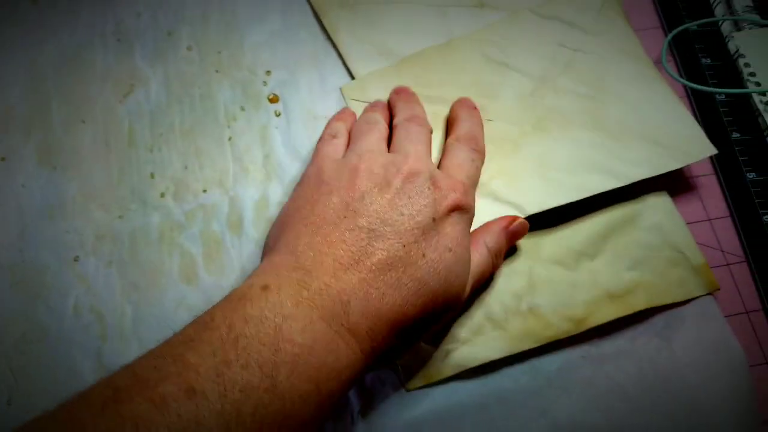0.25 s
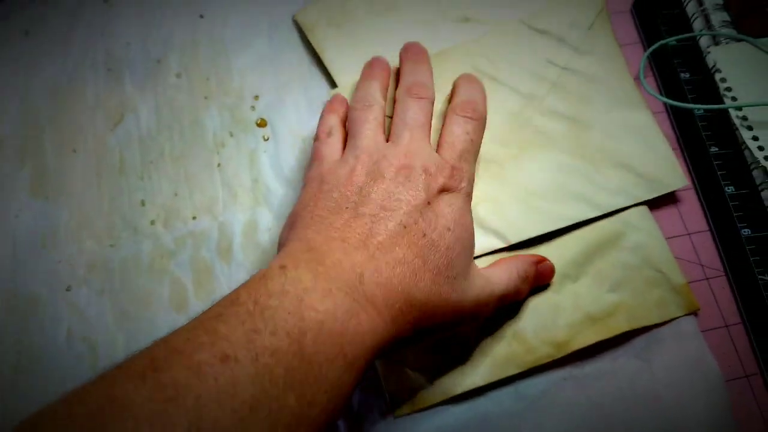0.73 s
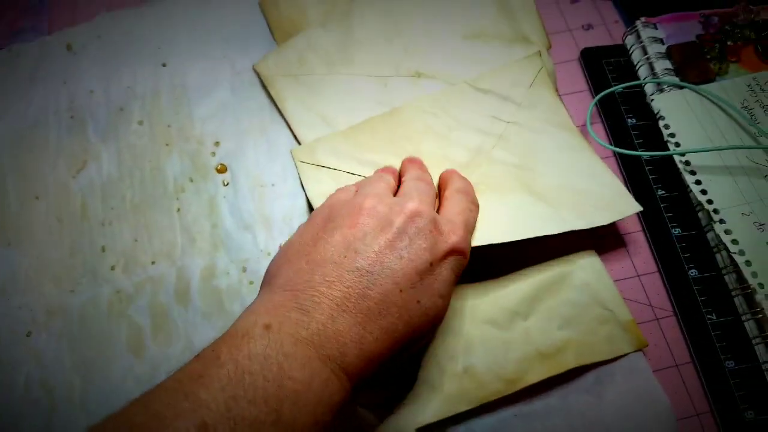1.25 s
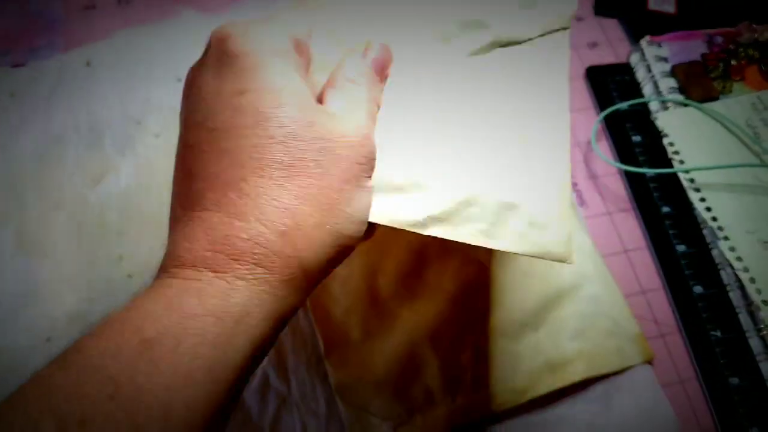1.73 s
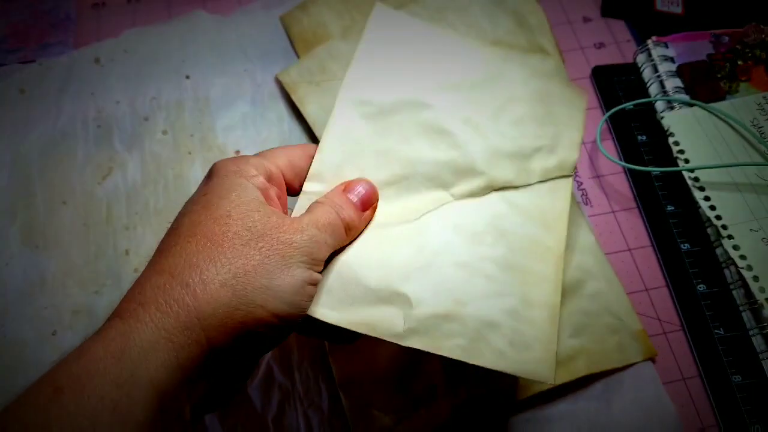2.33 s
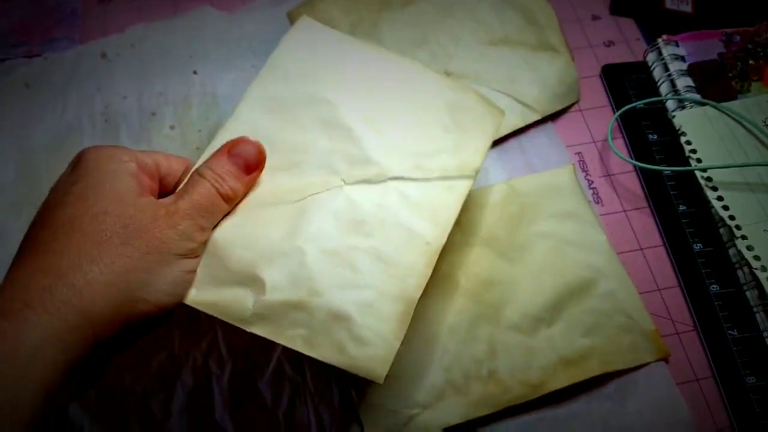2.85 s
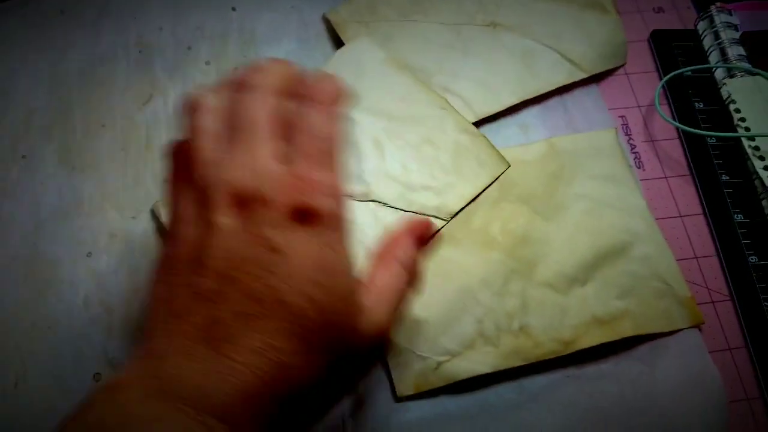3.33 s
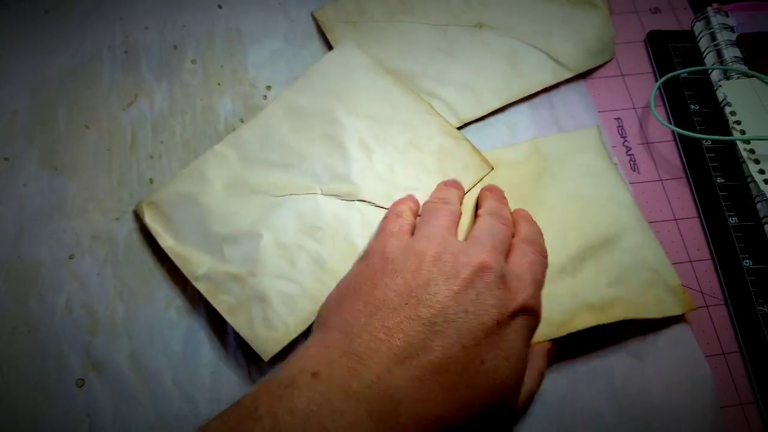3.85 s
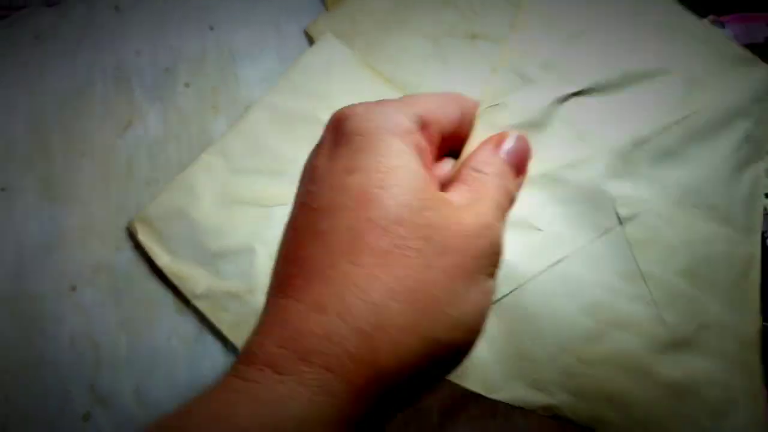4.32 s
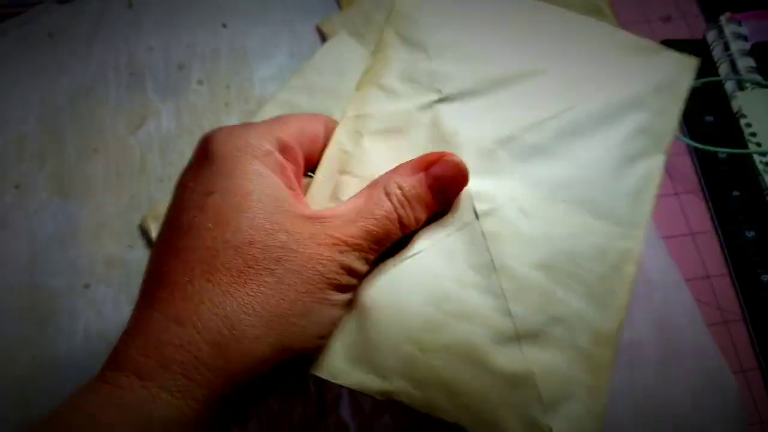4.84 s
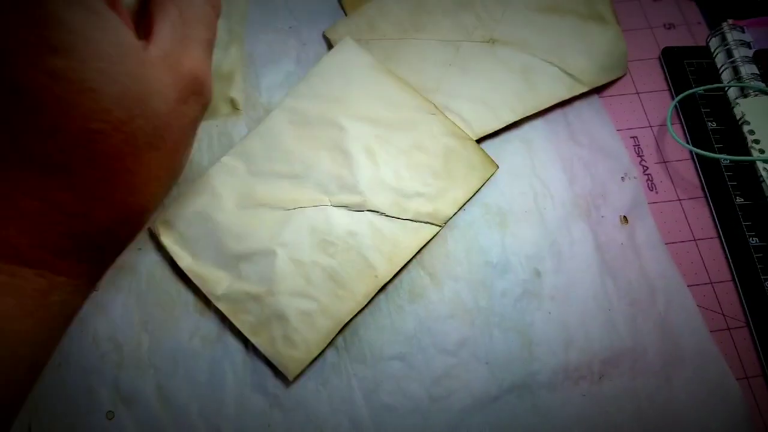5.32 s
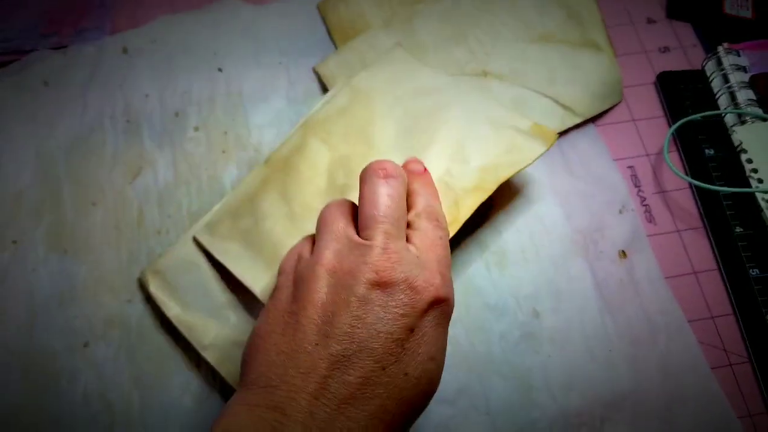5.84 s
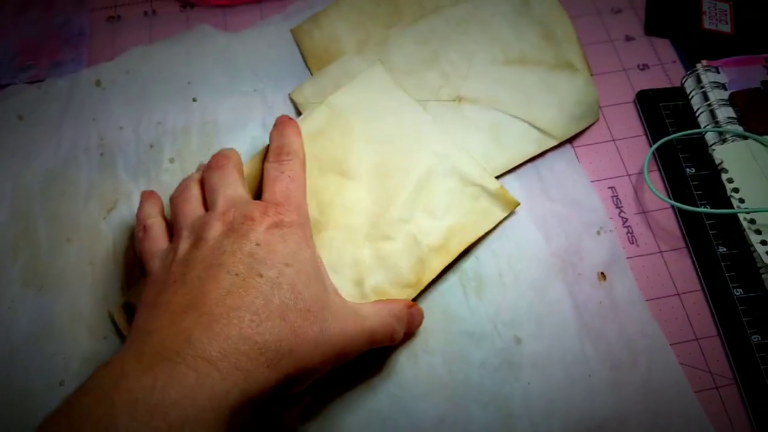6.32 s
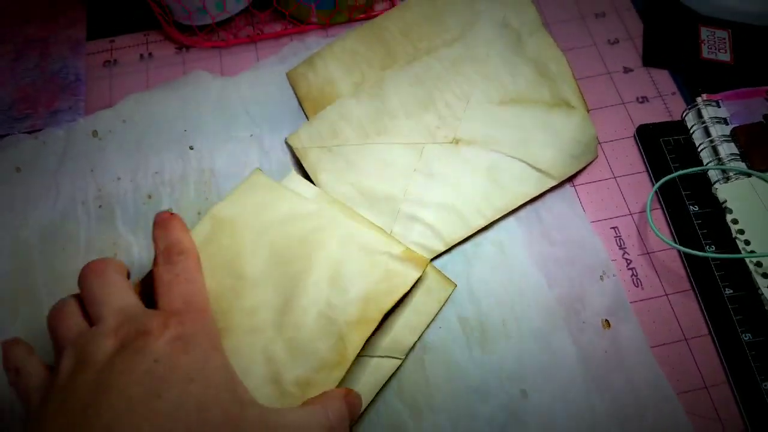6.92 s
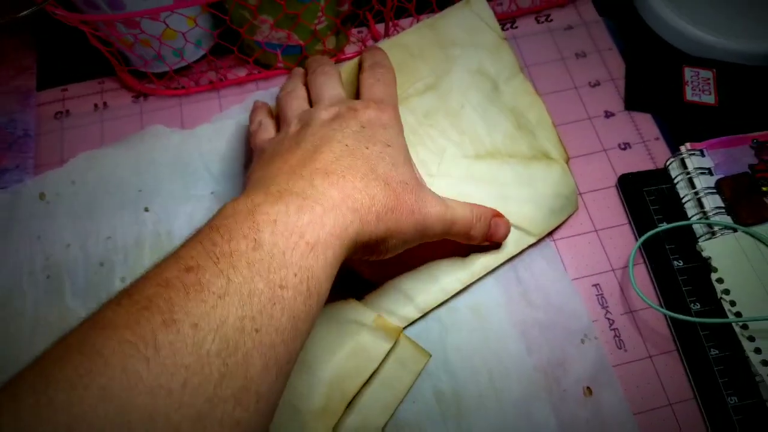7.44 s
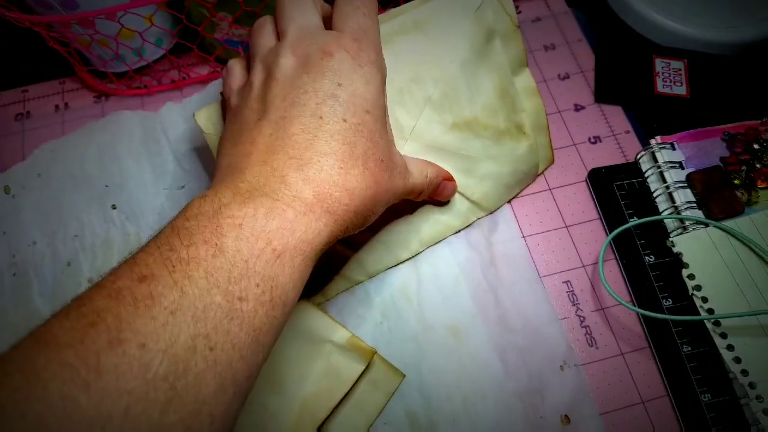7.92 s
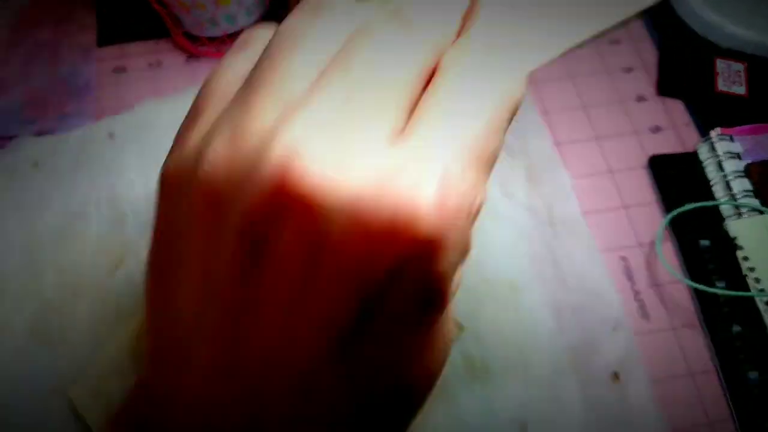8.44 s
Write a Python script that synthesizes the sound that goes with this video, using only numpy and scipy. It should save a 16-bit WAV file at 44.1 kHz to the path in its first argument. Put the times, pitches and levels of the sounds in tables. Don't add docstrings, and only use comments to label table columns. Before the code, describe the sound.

Very close stereo handling of stiff dried paper envelopes on a worktable, in a small room with a short soft reflection, faint low house rumble and microphone hiss. From 0 to 1.5 s a hand presses and gathers the top envelope: dense dry crackle, sharp snaps around 0.35, 0.7, 0.93 and 1.42, with grainy rubbing between. From 1.6 it is lifted and turned, with brighter rustle and strong snaps at 2.15 to 2.27; then all sound drops out from about 2.3 to 2.47. Lighter rustles and a setting down follow to 3.5. Rubbing swells at 3.85 and 4.15, then the loudest hollow crack and pop come at 4.45 to 4.5. Smaller pops run to 5.1. From 5.3 to 7.6 it is sparser and softer, sliding and stacking, with a short scrape at 6.7. Rubbing rises at 7.8, crackles thicken, and a bright burst hits at 8.3 before fading.

```python
import sys
import numpy as np
from scipy import signal
from scipy.fft import rfft, irfft
from scipy.io import wavfile
from scipy.ndimage import uniform_filter1d

SR = 44100
rng = np.random.default_rng(int(sys.argv[2]) if len(sys.argv) > 2 else 0)


def dump(signal):
    limited = np.clip(np.atleast_2d(signal).T, -1, 1)
    pcm = np.round(limited * 32767).astype(np.int16)
    wavfile.write(sys.argv[1], SR, pcm)


def boost_factor(decibels):
    exponent = np.asarray(decibels, float) / 20
    return 10 ** exponent


N = 382788

PORT_LAG = 3.72


def unit(x):
    return x / np.sqrt(np.mean(x ** 2))


def colour(x, points, size=4096):
    hz, db = np.transpose(points[:-1])
    log_hz = np.log(np.maximum(np.arange(size // 2 + 1) * SR / size, 1))
    cepstrum = irfft(np.interp(log_hz, np.log(hz), db) * np.log(10) / 20)
    cepstrum[1:size // 2] *= 2
    cepstrum[size // 2 + 1:] = 0
    response = irfft(np.exp(rfft(cepstrum))).reshape((1,) * (x.ndim - 1) + (-1,))
    return signal.fftconvolve(x, response, axes=-1)[..., :x.shape[-1]]


def walk(rate):
    hold = int(SR / rate)
    steps = np.repeat(rng.standard_normal(N // hold + 1), hold)
    return unit(uniform_filter1d(uniform_filter1d(steps, hold), hold)[:N])


def decay(t, t60_s):
    return np.exp(-t * np.log(1000) / t60_s)


def ports(x, lag):
    i = np.arange(x.shape[-1])
    return np.array([np.interp(i - lag / 2, i, x), np.interp(i + lag / 2, i, x)])


def lean(pan_db):
    return np.array([pan_db, -pan_db]) / 2


def hand_pan(s):
    # time_s, left_minus_right_db
    hand_places = [(0.1, 2.5), (0.9, 1.5), (1.6, 1.5), (2.2, 3.5), (2.8, 6.5), (3.3, 5), (3.8, 0.65),
                   (4.4, 0.0), (5.0, 4), (5.7, 4.5), (6.1, 2), (7.2, 5), (8.0, 1.5), (8.6, 2.0)]
    return np.interp(s, *np.transpose(hand_places))


def paper_bands(x):
    # freq_hz, level_db (per Hz)
    paper_colour = [(120, -30.5), (200, -6), (564, -7), (653, -3), (957, -4), (1110, -7.5), (1380, -5),
                    (1620, -7), (2420, -5.5), (5700, -7.5), (7760, -10.5), (9140, -14), (15500, -15)]
    edges_hz = [1100, 3300, 7800]
    x = colour(x, paper_colour)
    shapes = [(edges_hz[0], "low"), (edges_hz[:2], "band"), (edges_hz[1:], "band"), (edges_hz[2], "high")]
    return [signal.sosfilt(signal.butter(3, hz, kind, fs=SR, output="sos"), x) for hz, kind in shapes]


def house():
    # freq_hz, level_db (per Hz)
    house_colour = [(15, -46.5), (25, -20), (37, -18), (59, -10), (71, -14.5), (82, -14.5), (136, -14.5),
                    (233, -36), (399, -33), (684, -44), (895, -40.5), (1020, -39.5), (1660, -41.5),
                    (3930, -48.5), (15500, -52)]
    # freq_hz, level_db (rms)
    hum_tones = [(54.5, -74.5), (123, -84.5)]
    shared = colour(rng.standard_normal(N), house_colour)
    own = colour(rng.standard_normal((2, N)), house_colour)
    rumble = signal.sosfilt(signal.butter(1, 200, fs=SR, output="sos"), (shared - own) * 0.4)
    t = np.arange(N) / SR
    hum = sum(boost_factor(db) * np.sqrt(2) * np.sin(2 * np.pi * hz * t) for hz, db in hum_tones)
    return unit(own + rumble) * boost_factor(-68.5 + 0.73 * walk(5.0)) + hum * [[1], [0.7]]


def snaps(table, longest_s, size=5000):
    scatter_t60_s, shorter_per_db = 0.042, 0.16
    aftercrack_db = 3.5
    out, t, bursts, pans = np.zeros((2, N + size)), np.arange(size) / SR, [], []
    for s, peak_db, edge_db, hz in table:
        noise, chance = rng.standard_normal((3, size)), rng.random(4)
        t60 = np.clip(scatter_t60_s * boost_factor(-shorter_per_db * (peak_db + 27.5)), .015, longest_s)
        pan_db = 1.053 * hand_pan(s) + 6.47 * (chance[1] - .5)
        crack = min(.075 / t60, 1) * np.exp(-t / (.0003 + .0004 * chance[0]))
        scatter = 0.28 * decay(t, t60) * (1 - np.exp(-t / (0.00024 + 0.88 * t60 ** 2)))
        scatter = scatter * boost_factor(aftercrack_db * np.repeat(noise[2, ::50], 50))
        both = ports(noise[0] * (crack + 0.93 * scatter), -1.2 * pan_db) + 1.18 * noise[1:] * scatter
        crease_ring = signal.lfilter(*signal.iirpeak(hz, 2.5, fs=SR), both)
        bursts.append(both + 1.2 * crease_ring)
        pans.append(pan_db)
    banded = paper_bands(np.array(bursts))
    for (s, peak_db, edge_db, hz), pan_db, flap, body, slip, edge in zip(table, pans, *banded):
        middle = body + boost_factor(0.36 * edge_db + 6.0) * slip
        gains = boost_factor([-21, 0, edge_db])
        burst = sum(g * b / np.abs(b).max() for g, b in zip(gains, (flap, middle, edge)))
        i = int(s * SR)
        out[:, i:i + size] += boost_factor(peak_db + 7.5 + lean(pan_db)[:, None]) * burst
    return out[:, :N]


def fine_creases():
    # start_s, peak_db, bright_edge_db, ring_hz
    fine_table = [(0.0144, -35, -16, 1490), (0.0245, -36.5, -10, 3000), (0.045, -44, -18, 2500),
                  (0.068, -35, -15, 2490), (0.1017, -41.5, -6, 2190), (0.2428, -38.5, -23, 1390),
                  (0.302, -54, -25, 2840), (0.4, -30.5, -11, 2500), (0.5641, -54, -14.5, 4540),
                  (0.5886, -38.5, -32, 1550), (0.7731, -46, -13.5, 4980), (1.0462, -34, -10, 2400),
                  (1.068, -34, -3, 2490), (1.087, -36, -6, 2200), (1.1209, -40, -13, 3000),
                  (1.1298, -38.5, -32, 1370), (1.1747, -49, -22.5, 2150), (1.1947, -44, -28, 2730),
                  (1.342, -38.5, -8, 4500), (1.355, -38, 3.5, 6000), (1.497, -49, -17, 2500),
                  (1.5319, -45, -15, 3470), (2.481, -38.5, -12.5, 1504), (4.572, -42, -30, 800),
                  (3.68, -46, -8, 4500), (3.74, -44.5, -15, 3500), (3.822, -38, -15, 3500),
                  (3.982, -46, -15, 4500), (4.066, -31, -17, 4000), (5.135, -52, -11, 6960),
                  (5.437, -44, -28, 1180), (5.9562, -54, -6.5, 3130), (6.257, -52, -25, 1380),
                  (6.4177, -48, -11, 3180), (6.6362, -42.5, -11, 3010), (7.3151, -63.5, -40, 1380),
                  (7.678, -51.5, -11, 2500), (7.7721, -47, -23, 1480), (7.947, -42, -34, 1300),
                  (8.2515, -33.5, -12, 3840), (8.2734, -34, -1, 3390), (8.3, -32, -25, 2400),
                  (8.5738, -54, -16, 4960), (2.1225, -38, -12, 4000), (8.109, -24, 0, 2500),
                  (8.117, -27, -2, 4050), (0.9945, -43, -18, 2300), (1.1765, -45, -10, 2200),
                  (8.1555, -45, -10, 2800)]
    return snaps(fine_table, 0.052, size=2500)


def stroke_db(offset_db, colour_share, steep):
    # fastest_s, level_db, swell_s, fade_s, brightness_db
    early = [(0.024, -49.5, 0.079, 0.38, -2), (.399, -43, 0.35, 0.27, -0.5),
             (0.598, -39.5, 0.028, 0.049, 0), (0.693, -41.5, 0.11, 0.29, 1.5),
             (1.004, -38.5, 0.18, 0.25, -0.5), (1.24, -43, 0.13, 0.54, 9.5),
             (1.427, -41.5, 0.27, 0.12, -3.5), (1.56, -47, 0.067, 0.53, 4), (1.69, -52, 0.16, 0.23, 3),
             (1.815, -38.5, 0.13, 0.07, 7), (1.95, -41, 0.1, 0.17, 7), (2.135, -45.5, 0.097, 0.039, -2.5),
             (2.409, -41.5, 0.28, 0.48, 1.5), (2.661, -47.5, 0.29, 0.24, 12), (3.018, -49, 0.033, 0.3, 1),
             (3.075, -40, 0.1, 0.21, 22), (3.169, -51, 0.091, 0.23, -0.5),
             (3.302, -49.5, 0.053, 0.071, -0.5), (3.374, -47.5, 0.066, 0.1, 0), (3.48, -59, .05, 0.13, 14),
             (3.693, -45, 0.017, 0.061, 7), (3.868, -36, 0.12, 0.17, 1.5), (3.76, -46.5, 0.037, 0.13, 7),
             (3.97, -41, 0.084, 0.18, 4), (4.163, -35, 0.33, 0.12, 2.5)]
    # fastest_s, level_db, swell_s, fade_s, brightness_db
    late = [(4.3, -49, 0.098, 0.096, 5), (4.52, -41.5, 0.14, 0.29, 4.5), (4.62, -51, 0.11, 0.1, 0),
            (4.69, -53, 0.33, 0.12, -1), (4.789, -73, 0.15, 0.064, -9), (4.88, -52, 0.029, 0.14, 16),
            (4.929, -46.5, 0.12, 0.13, 1), (5.29, -59, 0.051, 0.18, 5), (5.12, -63, .1, 0.11, -3),
            (5.385, -48, 0.17, 0.29, 11.5), (5.58, -52, 0.3, 0.13, -0.5), (5.96, -59, 0.012, 0.16, -2),
            (6.128, -46.5, 0.14, 0.15, -3.5), (6.26, -55, 0.16, 0.043, 2.5), (6.32, -68.5, 0.061, 0.23, 1),
            (6.57, -55.5, 0.035, 0.11, 13), (6.645, -51, 0.086, 0.13, -3.5), (6.97, -55, 0.14, 0.05, 2.5),
            (6.433, -50, 0.042, 0.35, -0.5), (6.715, -41.5, 0.12, 0.067, -2), (6.79, -60, .1, 0.13, -1.5),
            (7.074, -54, 0.29, 0.21, 1), (7.152, -59, 0.13, 0.049, 3), (7.4, -71.5, 0.27, 0.37, 9.5),
            (7.64, -68.5, 0.065, 0.19, -1), (7.7, -61, 0.018, 0.13, -7), (7.788, -46.5, 0.1, 0.38, -7.5),
            (7.865, -33, 0.15, 0.39, 1), (7.98, -40, 0.26, 0.095, -3), (8.09, -41, 0.25, 0.2, 1),
            (8.22, -37.5, 0.077, 0.14, 1.5), (8.28, -33.5, 0.027, 0.29, 10),
            (8.308, -26.5, 0.099, 0.021, 3), (8.36, -41.5, 0.045, 0.075, -3.5),
            (8.46, -59, 0.092, 0.084, 15), (8.589, -64, 0.46, 0.45, 7)]
    start, stall = 2.5, .7
    t, power = np.arange(0, N + 64, 64) / SR, 1e-12
    for s, level_db, swell, fade, bright_db in early + late:
        away = np.where(t < s, (s - t) / max(swell, .01), (t - s) / max(fade, .01))
        bend = 1 + np.where(t < s, start, stall) * np.maximum(away - 1, 0)
        peak_db = level_db + offset_db + colour_share * bright_db
        power = power + boost_factor(peak_db - 20 * steep * away * bend) ** 2
    return np.interp(np.arange(N) / SR, t, 10 * np.log10(power))


def rubbing():
    # offset_db, db_per_brightness_db, steepness
    band_drive = [
        (-15, -0.55, 1.19),
        (-1, -1.12, 1.32),
        (1.5, -0.1778, 1.317),
        (-2, 0.06, 1.51),
    ]
    # freq_hz, level_db
    slide_colour = [(300, 0.5), (650, -1), (950, -1), (1330, -0.5), (1750, -1), (2200, 0), (4200, -1),
                    (9000, -0.5), (15500, 0)]
    slips_per_s, ticks_per_s, lag_per_db = 14000, 130, -3
    pan_db = 0.787 * hand_pan(np.arange(N) / SR)
    sizes = boost_factor(np.minimum(2.0 * rng.exponential(size=(3, N)), 6))
    slips = rng.standard_normal((3, N)) * (rng.random((3, N)) < slips_per_s / SR) * sizes
    ticks = rng.random(N) < ticks_per_s * boost_factor(4 * walk(3)) / SR
    ticks = ticks * boost_factor(np.minimum(3.5 * rng.exponential(size=N), 7))
    ticks = signal.lfilter([1], [1, -np.exp(-1 / (.0018 * SR))], ticks)
    pressure = boost_factor(1.6 * walk(35)) * np.sqrt(1 + .8 * ticks ** 2)
    lag = PORT_LAG + lag_per_db * pan_db + 2.5 * walk(3.5)
    both = pressure * (ports(slips[0], lag) + .8 * slips[1:])
    out = 0
    for drive, band in zip(band_drive, paper_bands(colour(both, slide_colour))):
        flicker_db = 1.2 * walk(18)
        out = out + boost_factor(stroke_db(*drive) + flicker_db) * unit(band)
    return out * boost_factor(lean(pan_db))


def crease_snaps():
    # start_s, peak_db, bright_edge_db, ring_hz
    press = [(0.0545, -29, 0, 4700), (0.178, -41.5, 4.5, 6140), (0.2158, -36, 2.5, 1500),
             (0.2558, -32, -25, 2190), (0.2872, -25.5, -22.5, 1840), (0.3545, -17, -4, 1060),
             (0.3773, -20, -6, 1260), (0.4407, -34, -17, 2230), (0.46, -25, -3, 4500),
             (0.4909, -31.5, -1.5, 1720), (0.5395, -43.5, -25.5, 2060), (0.598, -25.5, -10, 1620),
             (0.659, -30.5, -3, 2550), (0.676, -26, -5, 4660), (0.6881, -17.5, -12, 1930),
             (0.7053, -14.5, -9.5, 1820), (0.7308, -27, -8, 3750), (0.8647, -32, -2, 2290),
             (0.8962, -30, -17, 2170), (0.9306, -16, -10.5, 1380), (0.9988, -25, -40, 2180),
             (1.041, -34, -6, 2320), (1.1007, -35.5, -27, 2290), (1.2095, -29, -7.5, 4450),
             (1.2376, -23, -22, 1560), (1.321, -41, -20, 2210), (1.409, -37, -18.5, 3820),
             (1.42, -19.5, -11, 1400), (1.4458, -21.5, -8, 2370), (1.5501, -38.5, -29, 1390)]
    # start_s, peak_db, bright_edge_db, ring_hz
    turn = [(1.6028, -29, -23, 1340), (2.1048, -27, -6.5, 4760), (2.146, -21, -14.5, 3400),
            (2.2285, -17, -10.5, 3600), (2.2681, -11, -4.5, 7200), (2.6732, -27.5, -48.5, 1300),
            (2.8199, -21, -19.5, 3760), (2.92, -39.5, -25, 1100), (3.1593, -33.5, -7.5, 5170),
            (3.261, -25.5, -12, 4450), (3.348, -28.5, -12, 2230), (3.3816, -29.5, -15, 3900),
            (3.448, -39.5, -6, 4800), (3.513, -46.5, -6, 4680), (3.7904, -34, -12.5, 1280),
            (3.8438, -24.5, -0.5, 4050), (3.8754, -21.5, -3, 4850), (3.8846, -24.5, 5.5, 4350),
            (4.02, -36, -12.5, 5160), (4.0291, -28, -1.5, 1370), (4.0828, -22, 2.5, 2770),
            (4.2246, -34, -6, 1550), (4.27, -35, -6, 3500), (4.306, -31.5, -27, 4900),
            (4.319, -33.5, -22, 3870), (4.351, -43, -32, 1270), (4.4404, -22, -14.5, 3700),
            (4.4659, -9.5, -10, 1750), (4.5087, -13.5, -16, 3730), (4.6526, -46, -24, 1200)]
    # start_s, peak_db, bright_edge_db, ring_hz
    stack = [(4.713, -24, -15, 1270), (4.9283, -40.5, -41, 1840), (4.944, -39, -25, 1300),
             (4.984, -22.5, -25.5, 1600), (5.0606, -27.5, -18, 1410), (5.0904, -26, -24, 2250),
             (5.1734, -32.5, -9, 4270), (5.5392, -27, -11, 3420), (5.558, -36, -27, 2400),
             (5.5908, -24, -17, 1400), (5.9931, -38.5, -14.5, 1210), (6.011, -61, -38, 1250),
             (6.0572, -36, -37, 3730), (6.1004, -27, -13, 1150), (6.509, -35, -16, 1360),
             (6.9014, -40.5, -2, 6030), (7.0233, -31.5, -12, 4900), (7.041, -36.5, -35, 1390),
             (7.1063, -29, -12, 3390), (7.3607, -47, -1.5, 3164), (7.6881, -40, 4, 1240),
             (7.7854, -28, -20, 1430), (7.8211, -26.5, 2, 4520), (8.012, -19, -4, 2410),
             (8.0688, -28.5, -8, 3740), (8.1125, -22, 2, 7040), (8.1312, -25, -2, 4430),
             (8.3119, -12.5, -2, 2370), (8.3619, -26, -28, 2680), (8.3863, -28, -9, 4650)]
    return snaps(press + turn + stack, 0.11)


def panel_rubs(size=6500):
    # loudest_s, level_db, swell_s, fade_s, panel_hz
    panels = [(0.2, -62.5, 0.057, 0.13, 1380), (1.05, -50, 0.054, .08, 2280),
              (1.261, -44, 0.052, 0.029, 2030), (1.424, -28, 0.02, 0.012, 1340),
              (3.695, -43, 0.014, 0.028, 4480), (3.951, -50, 0.052, 0.048, 1340),
              (4.9, -52, 0.043, .12, 4200), (5.39, -58, 0.19, 0.12, 3970), (5.45, -59, 0.028, 0.044, 1220),
              (5.66, -68, 0.053, 0.15, 950), (6.11, -48.5, 0.016, 0.031, 2800),
              (6.24, -60.5, 0.26, 0.083, 1070), (6.434, -46, 0.02, 0.056, 3200),
              (6.513, -54, 0.071, 0.035, 1350), (6.715, -35.5, 0.032, 0.023, 2040),
              (6.8, -65, 0.056, 0.039, 1350), (7.044, -43, 0.0046, 0.022, 1440),
              (7.86, -49, 0.033, 0.085, 2800), (8.013, -36.5, .004, 0.017, 1290),
              (8.073, -30, .015, 0.009, 3820), (8.242, -41.5, 0.009, .01, 700),
              (8.314, -18.5, 0.0069, 0.0085, 2340), (8.589, -58, 0.053, 0.027, 4500)]
    # loudest_s, level_db, swell_s, fade_s, panel_hz
    sheets = [(0.385, -53, 0.032, 0.09, 164), (2.5, -53, .01, 0.031, 248), (3.875, -56, 0.049, 0.12, 109),
              (4.361, -61, .05, 0.044, 170), (5.1, -54.5, .02, 0.042, 220),
              (6.16, -60.5, 0.066, 0.1, 266.6), (7.13, -61.5, .04, .06, 169),
              (0.258, -39, .003, 0.01, 2190), (0.29, -41, .003, 0.011, 1880),
              (1.132, -41, .003, 0.009, 1410), (2.234, -31, 0.004, 0.0095, 3300),
              (2.675, -42, 0.003, 0.0091, 1200), (2.922, -47, 0.0028, 0.013, 1136),
              (5.063, -36, .003, 0.0094, 2750), (7.363, -49.5, 0.0034, 0.015, 5000),
              (2.86, -53, .04, 0.035, 5500), (3.081, -43.5, 0.068, 0.099, 6470),
              (4.62, -56, 0.088, 0.066, 11500), (4.91, -52, .04, 0.13, 11500),
              (5.4, -59, 0.095, 0.16, 11000), (5.74, -67.5, .02, 0.033, 3900)]
    panel_q, hiss_db, hissing_hz = 4.3, -7.5, 2500
    out, t = np.zeros((2, N + 2 * size)), np.arange(-size, size) / SR
    for s, level_db, swell, fade, hz in panels + sheets:
        noise = rng.standard_normal((3, 2 * size))
        slips = ports(noise[0], PORT_LAG) + 0.6 * noise[1:]
        q = np.clip(panel_q * 5000 / hz, 1, panel_q)
        sung = signal.lfilter(*signal.iirpeak(hz, q, fs=SR), slips)
        sung = unit(signal.lfilter(*signal.iirpeak(hz, 1, fs=SR), sung))
        hiss = unit(np.diff(slips, prepend=0) + slips / 2)
        sung = sung + boost_factor(hiss_db) * min(hz / hissing_hz, 1) * hiss
        away = np.where(t < 0, -t / max(swell, .003), t / max(fade, .003))
        i = int(s * SR)
        out[:, i:i + 2 * size] += boost_factor(level_db - 20 * away ** 1.4 + lean(hand_pan(s))[:, None]) * sung
    return out[:, size:size + N]


def ring(hz, t60, t):
    return np.sin(2 * np.pi * hz * t) * decay(t, t60)


def pops(size=7000, count=7):
    # start_s, peak_db, panel_hz, t60_s
    pop_table = [(0.356, -26, 1030, 0.032), (0.372, -30, 670, 0.05), (0.703, -26, 970, 0.013),
                 (1.128, -36.5, 880, 0.026), (1.415, -25.5, 830, 0.059), (1.444, -26, 988, 0.043),
                 (1.547, -41, 680, 0.11), (1.657, -43, 327, 0.07), (1.691, -46, 326, 0.14),
                 (1.966, -40, 753, 0.048), (2.1442, -31, 640, 0.049), (2.189, -42, 654, 0.027),
                 (2.265, -34, 670, 0.11), (2.502, -31.5, 673, 0.038), (2.6701, -28, 1055, 0.02),
                 (4.466, -24.5, 900, 0.027), (4.508, -15.5, 802, 0.04), (4.652, -29.5, 950, 0.02),
                 (4.712, -30, 680, 0.048), (4.854, -47, 370, 0.075), (4.926, -35, 937, 0.041),
                 (4.983, -26.5, 927, 0.024), (5.055, -29, 994, 0.042), (5.087, -29, 856, 0.029),
                 (5.536, -41, 300, 0.25), (5.592, -26.5, 480, 0.037), (6.01, -31, 1106, 0.027),
                 (7.784, -30, 880, 0.037), (7.974, -30, 766, 0.036), (8.309, -28.5, 784, 0.012),
                 (2.0978, -47, 620, .018), (2.128, -33, 800, 0.022), (2.138, -32.5, 700, 0.021),
                 (2.008, -44.5, 860, 0.022), (2.66, -44.5, 820, 0.027)]
    # freq_hz, level_db (relative to the pop), t60_s
    table_modes = [(115, -29, 0.12), (164, -22.5, 0.099), (236, -25, 0.028)]
    out, t = np.zeros(N + size), np.arange(size) / SR
    thud = sum(boost_factor(db) * ring(hz, t60, t) for hz, db, t60 in table_modes) * (1 - np.exp(-t / 0.0011))
    for s, peak_db, hz, t60 in pop_table:
        chance, t60 = rng.random((count, 2)), np.clip(t60, .015, .25)
        neighbours = chance[:, 1:] * ring(hz * (.45 + 1.4 * chance[:, :1]), .7 * t60, t)
        neighbours += chance[:, :1] * ring(hz * (.62 + .75 * chance[:, 1:]), .8 * t60, t)
        panel = (ring(hz, t60, t) + 0.6 * neighbours.sum(axis=0)) * (1 - np.exp(-t / 0.001))
        i = int((s + .0018) * SR)
        out[i:i + size] += boost_factor(peak_db) * (panel / np.abs(panel).max() + thud)
    return ports(out[:N], -2.5) * boost_factor([[1.2], [-1.2]])


def room(size=8000):
    t60_s, level_db = 0.12, -14.5
    t = np.arange(size) / SR
    tail = rng.standard_normal((2, size)) * decay(t, t60_s) * (t > .004)
    tail = signal.sosfilt(signal.butter(1, 7000, fs=SR, output="sos"), tail)
    return boost_factor(level_db) * unit(tail) / np.sqrt(size)


def scene():
    behind = house()
    paper = fine_creases() + rubbing() + crease_snaps() + panel_rubs() + pops()
    return paper + signal.oaconvolve(paper, room(), axes=1)[:, :N] + behind


def band_limit(x):
    return signal.sosfilt(signal.butter(12, 16830, fs=SR, output="sos"), x)


def record(dry):
    # stop_s, return_s
    dropout = (2.312, 2.4735)
    t = np.arange(N) / SR
    stop, back = dropout
    gate = np.where((t > stop) & (t < back), 0.18 * np.exp(-np.abs(t - stop) / 0.0021), 1)
    dry = signal.sosfilt(signal.ellip(8, .3, 38, 15850, fs=SR, output="sos"), dry)
    treble = signal.sosfilt(signal.butter(2, 6500, "high", fs=SR, output="sos"), dry)
    dry = dry + [[-.12], [.12]] * treble
    return band_limit(dry * gate)


dry = scene()
out = record(dry)
dump(out)
```